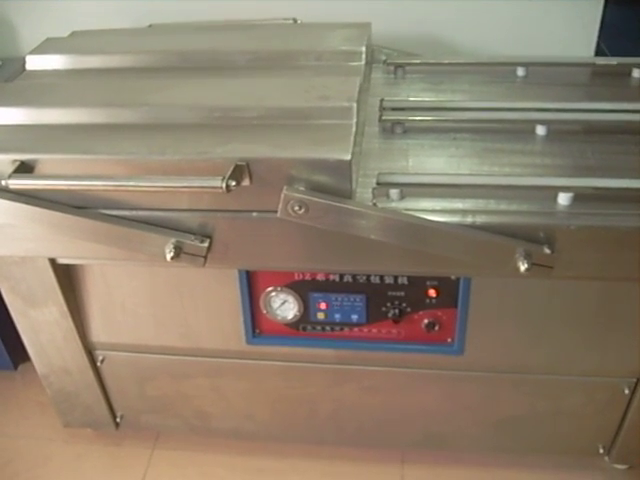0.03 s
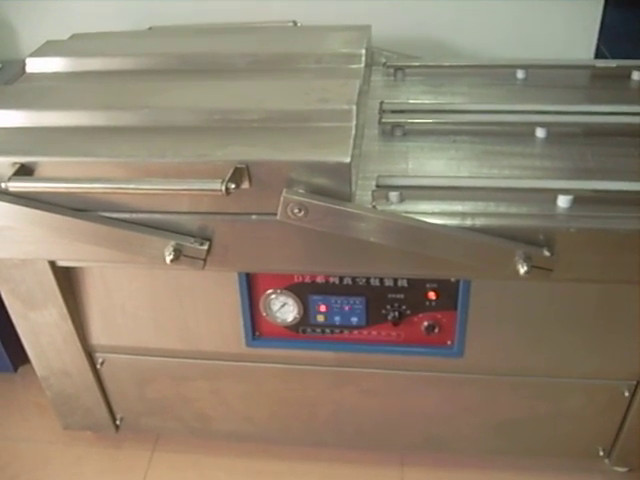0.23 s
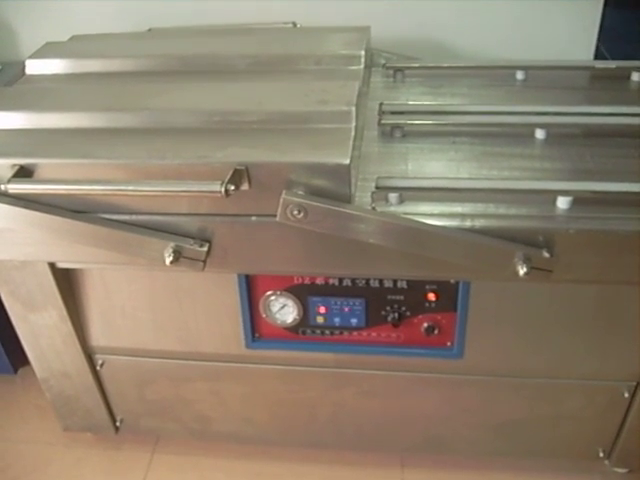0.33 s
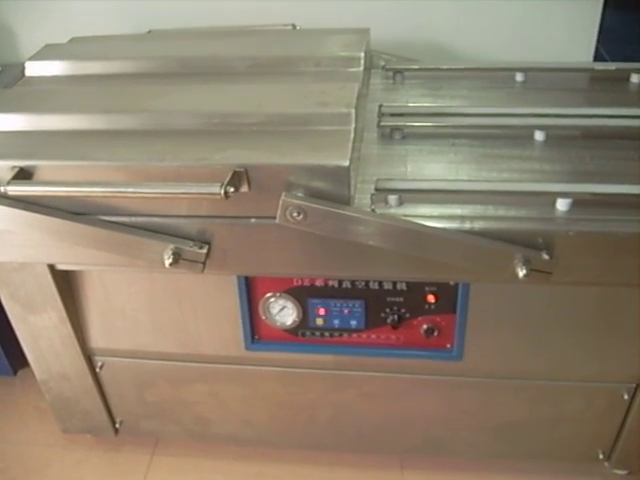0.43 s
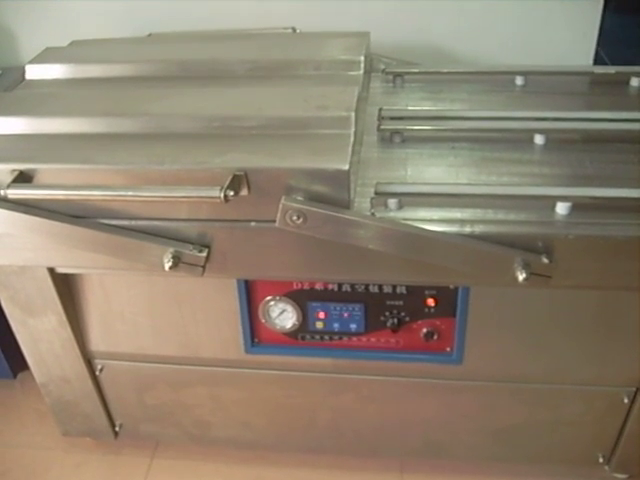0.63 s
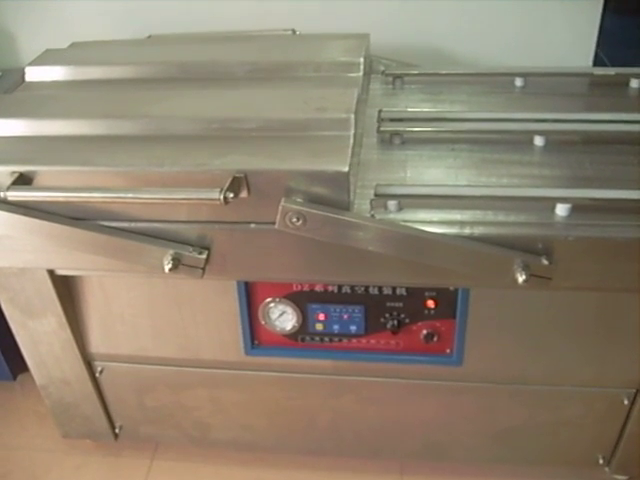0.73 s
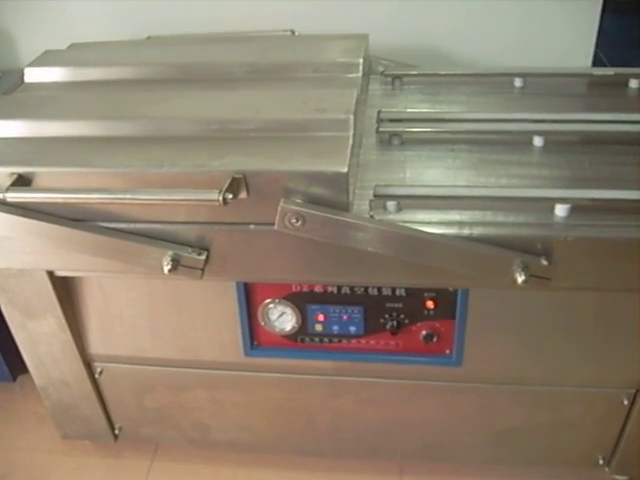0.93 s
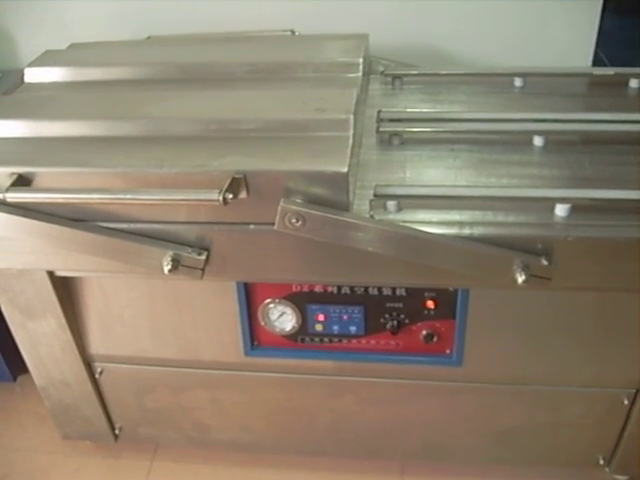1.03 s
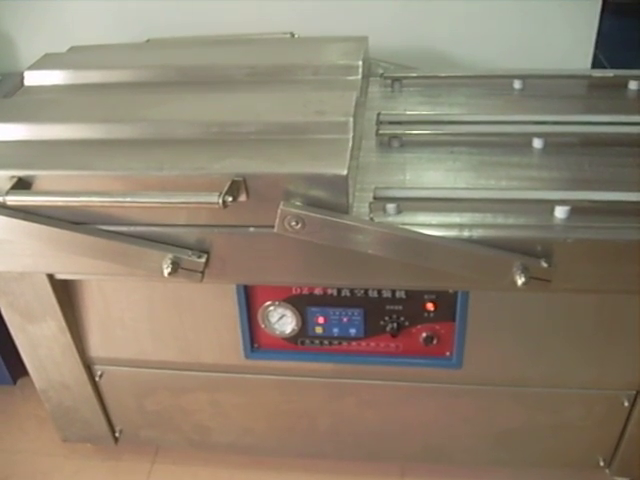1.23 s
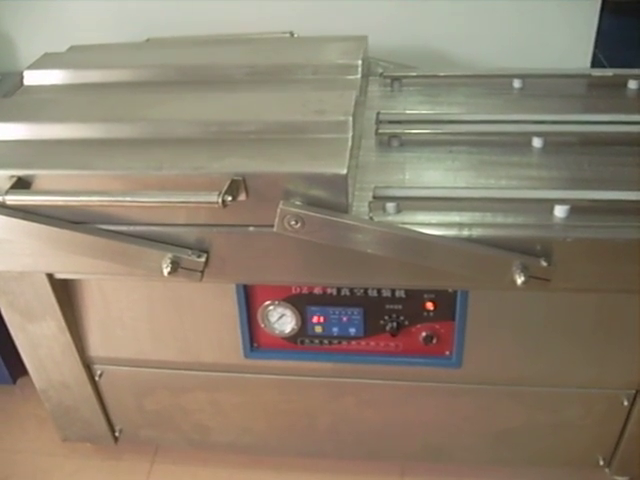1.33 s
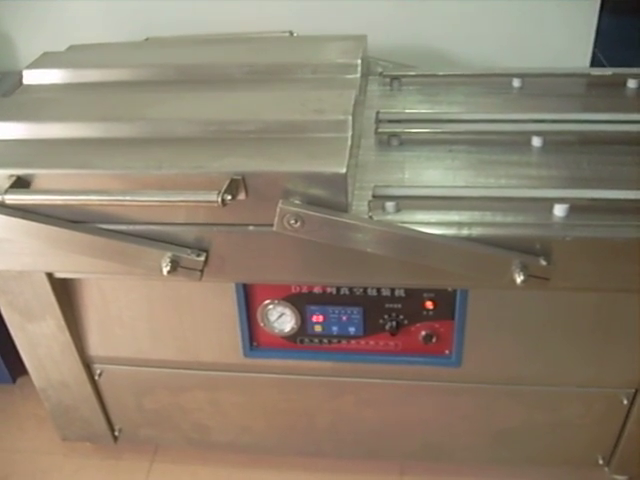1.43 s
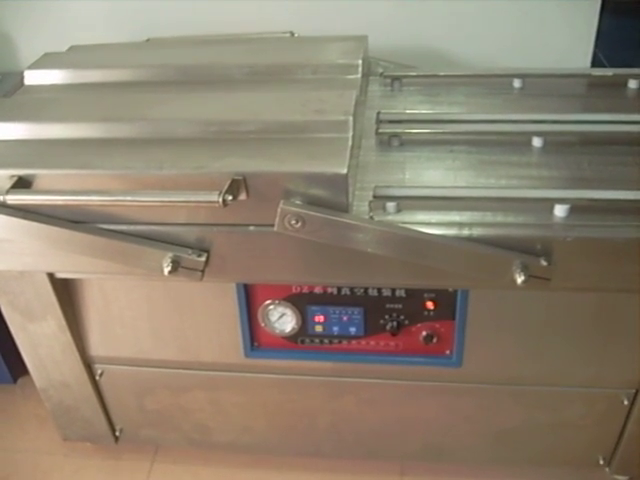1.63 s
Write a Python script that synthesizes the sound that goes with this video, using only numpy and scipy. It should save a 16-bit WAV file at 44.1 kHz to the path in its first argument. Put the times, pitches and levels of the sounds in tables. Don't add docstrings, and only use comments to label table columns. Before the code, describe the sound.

A vacuum packing machine vents a loud burst of hissing air that fades, then clacks shut

```python
import sys
import numpy as np
from scipy import signal
from scipy.fft import rfft, irfft
from scipy.io import wavfile
from scipy.ndimage import uniform_filter1d

SR = 44100
rng = np.random.default_rng(int(sys.argv[2]) if len(sys.argv) > 2 else 0)


def amplitude_ratio(level_db):
    exponent = np.asarray(level_db, float) / 20
    return 10 ** exponent


def inscribe(sig):
    pcm = np.round(np.clip(np.atleast_2d(sig).T, -1, 1) * 32767)
    wavfile.write(sys.argv[1], SR, pcm.astype(np.int16))


N = 74970
T = np.arange(N) / SR
BANDS_HZ = 45 * 2 ** np.arange(0, 8.2, 1 / 3)

# pitch_hz, density_db (per Hz)
VENTILATION = [(40, -9), (110, 1.5), (300, 2), (800, -2.5), (2500, -1), (3700, -8), (5200, -22.5),
               (10000, -28.5)]
# pitch_hz, level_db (rms), phase_sway_rad
MACHINE_TONES = [(376.8, -76, 1.5), (829, -68, 1.2), (2105, -74, 1.5), (4269, -83, .8), (7980, -88, .3)]
# pitch_hz, t60_s
ROOM_T60 = [(100, 0.4), (300, 1.48), (700, 1.3), (2500, 0.96), (3800, 1.19), (5000, 0.87), (10000, 0.76)]
# pitch_hz, gain_db
CLACK_SEND = [(200, 2), (350, -2), (700, 1), (1200, -1), (2400, -4), (3400, -6), (4500, -5), (10000, -8)]
# start_s, length_s, pitch_hz, level_db
PANEL_BOOMS = [(0.2, 0.06, 250, -39), (0.25, .045, 386.1, -32), (0.249, 0.04, 125.2, -42),
               (.262, .04, 230, -38), (0.28, .03, 285, -33), (0.305, 0.15, 214.3, -37),
               (0.329, 0.041, 469, -36), (.32, .06, 330, -41), (0.4, 0.055, 280, -39),
               (0.495, 0.06, 370, -46), (.61, .04, 370, -50), (1.315, 0.025, 356.8, -46),
               (1.345, 0.028, 305, -47), (1.325, .02, 460, -49), (1.37, .03, 460, -51),
               (1.49, .04, 460, -54), (1.585, .03, 300, -54)]
# start_s, level_db, rattle_s
LID_JOLTS = [
    (.208, -46.5, 0.016),
    (.231, -35, 0.0051),
    (.25, -37, 0.0043),
    (.257, -42.5, 0.022),
    (.2655, -33.5, 0.011),
    (.283, -38, 0.021),
    (.298, -42, 0.053),
    (.34, -49.5, 0.07),
    (.44, -50, .012),
]
# pitch_hz, level_db, t60_s
LID_MODES = [(620, -9, 0.13), (760, -21, 0.1), (1025, -20, 0.035), (1290, -18, 0.067), (1569, 7.5, 0.046),
             (1940, -1, 0.034), (2237, 2, 0.033)]
# pitch_hz, gain_db
LID_BODY = [(50, -4.5), (150, -4.5), (300, 2.5), (600, -8), (1000, -3), (2000, 0), (4000, -7), (8000, -50)]
# start_s, level_db, rattle_s
CLACKS = [
    (1.3012, -47.5, 0.0084),
    (1.3035, -34.5, 0.0079),
    (1.309, -43, 0.007),
    (1.3145, -38.5, 0.0072),
    (1.318, -39.5, 0.01),
    (1.324, -42.5, 0.0095),
    (1.333, -44, 0.0074),
    (1.343, -36, 0.0074),
    (1.36, -40, 0.0039),
    (1.378, -50, 0.01),
]
# pitch_hz, level_db, t60_s
VALVE_MODES = [(830, -8, 0.025), (900, -12, .02), (1235, -10, 0.03), (1900, -8, 0.012), (2390, 3, 0.015),
               (2700, 0, 0.01), (4300, -3, 0.01), (5000, -8, 0.015)]
# pitch_hz, gain_db
VALVE_BODY = [(100, -32), (300, -12), (600, -16), (1100, -11), (2400, 0), (3400, -6), (5000, -4),
              (6200, -20)]
# start_s, level_db
TICKS = [(.2035, -15), (.2047, -10), (.2078, -14), (.212, -17), (.2243, -8), (.2308, -12), (.2375, -16),
         (.2455, -15), (.255, -16), (.2653, -9), (.2668, -14), (.269, -12), (.2745, -9), (.2825, -13),
         (.2865, -13), (.291, -15), (.2935, -13), (.2993, -7), (.3075, -16), (1.3035, -27), (1.3616, -23)]
# pitch_hz, gain_db
TICK_EDGE = [(200, -31), (800, -24), (1500, 4), (2500, -0.5), (3500, 15), (5000, -40), (8000, -25),
             (11000, -23)]
# time_s, level_db
FLOW = [(.2005, -83), (.2035, -24.5), (.255, -32.5), (.27, -24.5), (.32, -30.5), (.36, -28), (.66, -34.5),
        (.8, -33.5), (.95, -38), (1.07, -39.5), (1.15, -42), (1.29, -49), (1.33, -68)]
# pitch_hz, density_db (per Hz)
JET = [(60, 0), (300, -6.5), (900, -18.5), (2000, 2.5), (3500, 4), (6000, -4.5), (8500, -11.5),
       (12000, -14)]
# pitch_hz, width_hz, peak_db (at the best flow)
NOZZLE = [(5130, 70, 3), (6240, 35, 10), (7180, 25, 6), (10020, 110, 7)]
# pitch_hz, width_hz, gain_db
PRESENCE = [(3362, 624, 6.5), (3765, 2140, -1)]


def unit(x):
    return x / np.sqrt(np.mean(x ** 2))


def at(table, hz):
    pitch_hz, value = np.array(table).T
    return np.interp(np.log(hz), np.log(pitch_hz), value)


def colour(x, table):
    cepstrum = irfft(np.log(amplitude_ratio(at(table, np.arange(2049) * SR / 4096 + 1))))
    cepstrum[1:2048] *= 2
    cepstrum[2049:] = 0
    response = irfft(np.exp(rfft(cepstrum)))[:2048]
    return signal.fftconvolve(x, response)[:N]


def band(x, hz, width_hz):
    return signal.lfilter(*signal.iirpeak(hz, hz / width_hz, SR), x)


def double_band(x, hz, width_hz):
    return band(band(x, hz, width_hz), hz, width_hz)


def walk(rate_hz):
    size = int(SR / rate_hz)
    return unit(uniform_filter1d(uniform_filter1d(rng.standard_normal(N), size), size))


def rattle(events, scatter_db):
    noise = rng.standard_normal(N)
    spikes_db = scatter_db * np.minimum(rng.exponential(size=N), 2)
    grit = unit(noise * amplitude_ratio(spikes_db))
    force = np.zeros(N)
    for start_s, level_db, length_s in events:
        force += amplitude_ratio(level_db) * (T >= start_s) * np.exp(-np.abs(T - start_s) / length_s)
    return grit * force


def struck(force, modes, body, body_db):
    ring = np.zeros(N)
    for hz, level_db, t60_s in modes:
        decay = 1000. ** (-T / t60_s) / np.sqrt(t60_s * SR)
        ring += amplitude_ratio(level_db) * np.sin(2 * np.pi * hz * T) * decay
    thud = colour(signal.unit_impulse(N), body)
    thud = amplitude_ratio(body_db) * thud / np.linalg.norm(thud)
    return signal.fftconvolve(force, 2 * ring + thud)[:N]


def hum():
    tones = np.zeros(N)
    for hz, level_db, sway_rad in MACHINE_TONES:
        phase = 2 * np.pi * hz * T + sway_rad * walk(22)
        tones += amplitude_ratio(level_db) * np.sqrt(2) * np.sin(phase)
    level = amplitude_ratio(-54.5 + 1.0 * walk(19))
    return level * unit(colour(rng.standard_normal(N), VENTILATION)) + tones


def room(x):
    delay_s, early_t60_s, early_db = 0.0038, 0.094, -1
    tail = np.zeros(N)
    for hz in BANDS_HZ:
        tail += double_band(rng.standard_normal(N), hz, hz / 3) * 1000. ** (-T / at(ROOM_T60, hz))
    tail *= np.clip(T / delay_s - 1, 0, 1)
    tail *= 1 + amplitude_ratio(early_db) * 1000. ** (-T / early_t60_s)
    return signal.fftconvolve(x, tail / np.linalg.norm(tail))[:N]


def panel_booms():
    edge_s = 0.006
    out = np.zeros(N)
    for start_s, length_s, hz, level_db in PANEL_BOOMS:
        nearest_end_s = np.minimum(T - start_s, start_s + length_s - T)
        swell = np.clip(nearest_end_s / edge_s, 0, 1) * amplitude_ratio(level_db + 1.05 * walk(60))
        out += swell * np.sin(2 * np.pi * hz * T + 0.53 * walk(40))
    return out


def lid_jolts():
    return struck(rattle(LID_JOLTS, scatter_db=0.91), LID_MODES, LID_BODY, body_db=10)


def closing_clack():
    return struck(rattle(CLACKS, scatter_db=2.8), VALVE_MODES, VALVE_BODY, body_db=3.5)


def valve_ticks():
    hz, width_hz, edge_db = 3508, 960, -8.5
    snaps = np.zeros(N)
    for start_s, level_db in TICKS:
        snaps[int(start_s * SR)] = amplitude_ratio(level_db)
    ping = band(double_band(snaps, hz, width_hz), hz, width_hz)
    return 10 * ping + amplitude_ratio(edge_db) * colour(snaps, TICK_EDGE)


def jet():
    tilt_db_per_octave = 0.061
    spits_per_s, spit_db, gust_db, flicker_db = 280, -9, 1.5, 0
    seal_s, seal_rise_s, seal_hz, seal_db = 0.192, 0.039, 2710, -10
    flow_db = np.interp(T, *np.array(FLOW).T)
    spits = (rng.random(N) < spits_per_s / SR) * rng.standard_normal(N)
    spits *= amplitude_ratio(spit_db) * np.sqrt(SR / spits_per_s)
    gust = walk(30)
    sealed_db = seal_db * np.clip(1 - (T - seal_s) / seal_rise_s, 0, 1)
    lost_db = np.clip(-21 - flow_db, 0, 20)
    out = np.zeros(N)
    for hz in BANDS_HZ:
        eddy = double_band(rng.standard_normal(N) + spits, hz, hz / 3)
        tilt_db = tilt_db_per_octave * lost_db * np.log2(hz / 3500)
        tilt_db += sealed_db / (1 + (hz / seal_hz) ** 8)
        out += eddy * amplitude_ratio(at(JET, hz) + tilt_db + flicker_db * walk(9.8))
    sing_db = -1.2 * np.abs(flow_db + 37)
    out = out + sum(amplitude_ratio(peak_db + sing_db) * band(out, hz, width_hz) for hz, width_hz, peak_db in NOZZLE)
    dip = 0.45 * amplitude_ratio(2 * np.minimum(sing_db - 0.5, 0))
    out = out - dip * band(out, 8200, 1800)
    return out * amplitude_ratio(flow_db + gust_db * gust)


def scene():
    air, snaps, clack = jet(), valve_ticks(), closing_clack()
    lid, panels = lid_jolts(), panel_booms()
    send = air + amplitude_ratio(-8) * snaps + amplitude_ratio(-1.5) * colour(clack, CLACK_SEND)
    send += amplitude_ratio(-6) * lid + amplitude_ratio(-11.5) * panels
    return (air + snaps + clack + lid + panels + room(send) + hum())[None]


def band_limit(x):
    return signal.sosfilt(signal.butter(12, 11480, fs=SR, output="sos"), x)


def record(dry):
    low_hz, top_hz = 81, 9940
    mix = dry + sum(amplitude_ratio(gain_db) * double_band(dry, hz, width_hz) for hz, width_hz, gain_db in PRESENCE)
    mix = signal.sosfilt(signal.butter(2, low_hz, "high", fs=SR, output="sos"), mix)
    mix = signal.sosfilt(signal.butter(8, top_hz, fs=SR, output="sos"), mix)
    return band_limit(mix)


dry = scene()
out = record(dry)
inscribe(out)
```